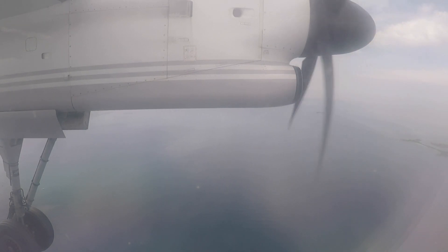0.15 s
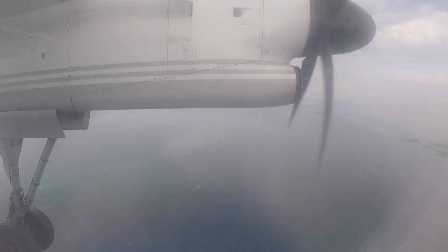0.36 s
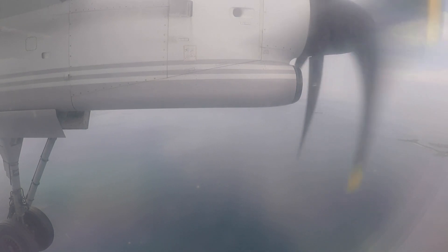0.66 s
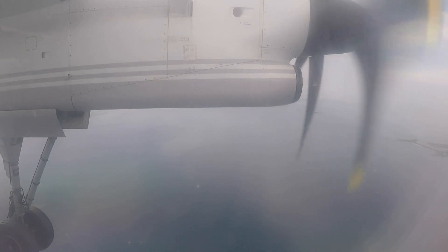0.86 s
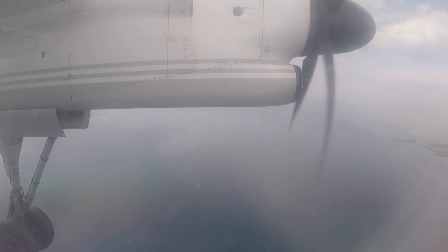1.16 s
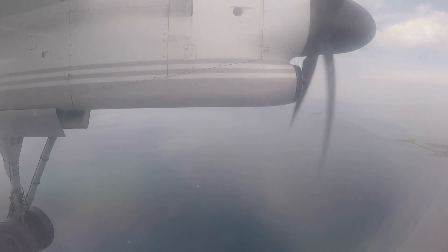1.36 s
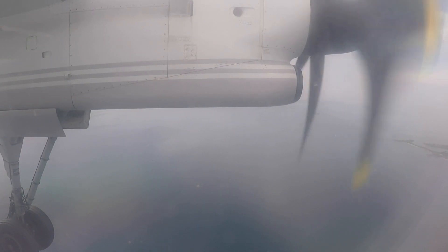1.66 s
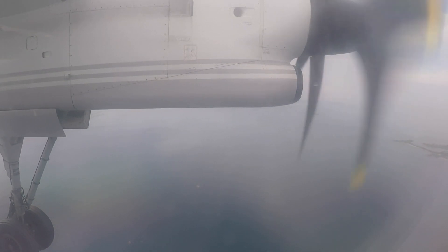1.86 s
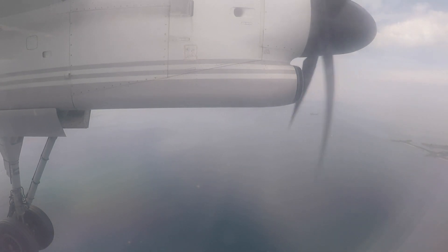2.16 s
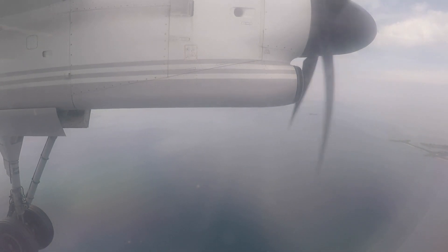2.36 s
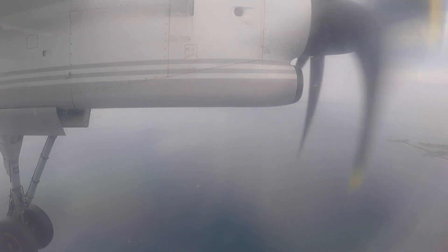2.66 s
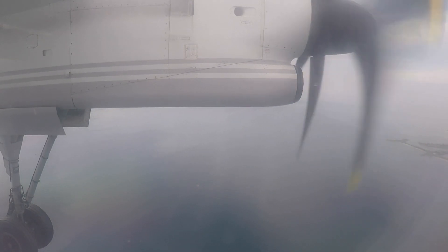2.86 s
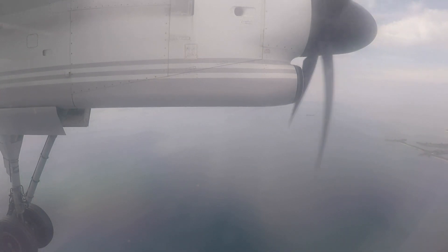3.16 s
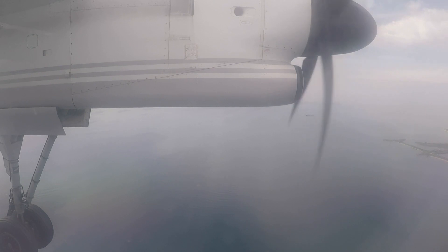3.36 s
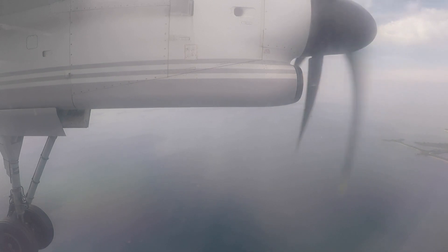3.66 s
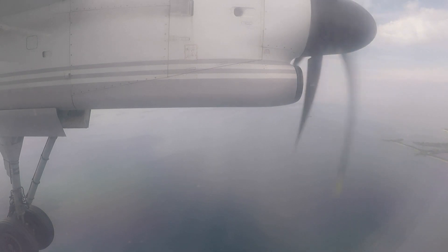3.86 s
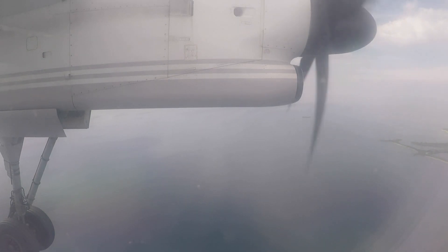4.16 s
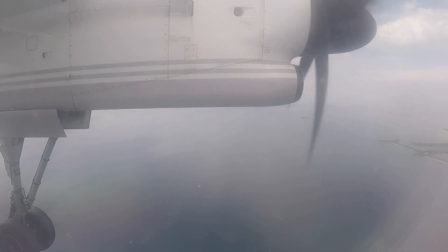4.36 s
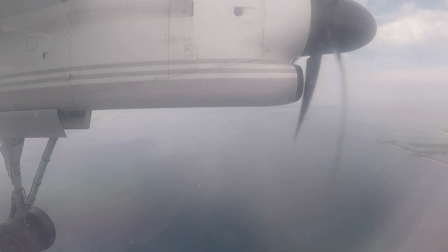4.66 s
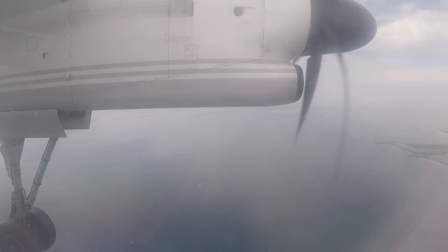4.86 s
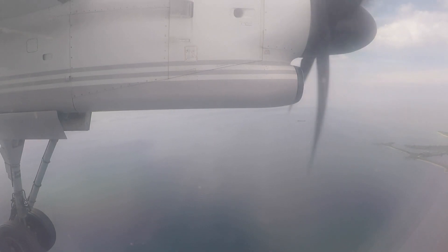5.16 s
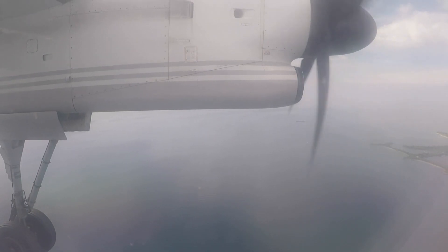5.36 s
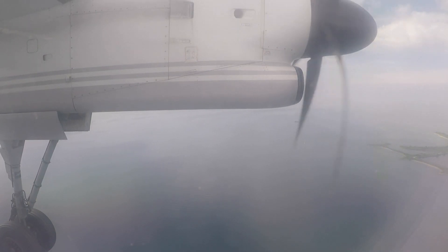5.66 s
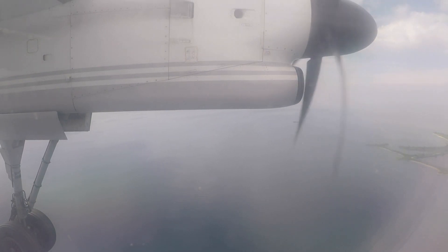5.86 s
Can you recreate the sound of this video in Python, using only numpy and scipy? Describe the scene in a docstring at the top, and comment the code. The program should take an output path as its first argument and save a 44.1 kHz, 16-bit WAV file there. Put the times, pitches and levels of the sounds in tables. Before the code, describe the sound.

Heard from a window seat, a turboprop plane's engine hums and rumbles steadily, with booming air buffeting and a thin whine.

```python
"""Window seat beside the engine of a turboprop airliner on approach, landing gear down.
From the start a gust booms the cabin; propellers hum at blade rate and beat against air shed by the
gear; a gearbox whines over slipstream rush and turbine hiss. The slipstream eases by 2.6 s.
Trim ticks from 3.5 to 4.6 s, amid a second gust and surges off the gear; a last gust comes at 5.8 s.
The camera's limiter holds the bass down throughout."""
import sys
import numpy as np
from scipy import signal
from scipy.fft import irfft, next_fast_len
from scipy.io import wavfile
from scipy.ndimage import uniform_filter1d

SR = 44100
rng = np.random.default_rng(int(sys.argv[2]) if len(sys.argv) > 2 else 0)


def bounce(signal):
    """Save signal as a 16-bit WAV file at the path given by the first command-line argument."""
    frames = np.transpose(np.atleast_2d(signal))
    limited = np.clip(frames, -1, 1)
    pcm = np.round(limited * 32767).astype(np.int16)
    wavfile.write(sys.argv[1], SR, pcm)


N = 265041
TIME_S = np.arange(N) / SR
BINS_HZ = np.maximum(np.fft.rfftfreq(next_fast_len(N, True), 1 / SR), 1)


def undb(db):
    """Decibels to gain."""
    return 10 ** (np.asarray(db) / 20)


def unit(x):
    """Scale to rms 1."""
    return x / np.sqrt(np.mean(x ** 2))


def curve(points):
    """Rows of (time_s, value), interpolated at every sample."""
    return np.interp(TIME_S, *np.transpose(points))


def swells(rows):
    """Half-cosine rises and dips in dB, one per row."""
    return sum(db * np.cos(np.pi * np.clip((TIME_S - peak_s) / length_s, -.5, .5))
               for peak_s, length_s, db in rows)


def colour(points, peaks=()):
    """Gain per bin: smooth spectrum plus resonances, steep fall past the last point."""
    hz, db = np.transpose(points)
    lift_db = sum(up / (1 + (2 * (BINS_HZ - f) / width) ** 2) for f, width, up in peaks)
    fall_db = 36 * np.maximum(np.log2(BINS_HZ / hz[-1]), 0)
    return undb(np.interp(np.log(BINS_HZ), np.log(hz), db) + lift_db - fall_db)


def noise(gain):
    """Noise shaped by a gain per bin, rms 1."""
    spectrum = rng.standard_normal(len(BINS_HZ)) + 1j * rng.standard_normal(len(BINS_HZ))
    return unit(irfft(gain * spectrum)[:N])


def walk(rate_hz):
    """Slow random drift, rms 1."""
    return noise(np.exp(-(BINS_HZ / rate_hz) ** 2 / 2))


def steady(x, span_s):
    """Level out swells slower than span_s; keep the flutter."""
    size = max(int(span_s * SR), 2)
    return x / np.sqrt(uniform_filter1d(uniform_filter1d(x ** 2, size), size))


def tone(hz):
    """Sine on a moving frequency, rms 1."""
    return np.sqrt(2) * np.sin(2 * np.pi * (np.cumsum(hz) / SR + rng.random()))


def flow_db():
    """Slipstream strength about its mean."""
    # slipstream strength: time_s, level_db
    strength = [(0, -36.5), (0.4, -35.5), (1.15, -33.5), (1.45, -34.5), (1.8, -33.5), (2.15, -34.5),
                (2.6, -39), (3.9, -38.5), (5.05, -39.0), (5.4, -37), (6.0, -38)]
    db = curve(strength)
    return db - db.mean()


def hiss_db():
    """Turbine hiss level; follows the slipstream."""
    return -52.5 + .88 * flow_db()


def boom(modes):
    """Turbulence rings a few air modes, rms 1."""
    power = sum(undb(2 * db) / (1 + 2 * ((BINS_HZ - hz) / width) ** 2) ** 2 for hz, width, db in modes)
    return steady(noise(np.sqrt(power)), span_s=0.17)


def buffet(rumble_db=-17.5, boom_db=-20, upper_db=-21.5):
    """Turbulence booms the cabin over a deep rumble; gusts lift the lower modes."""
    # deep rumble spectrum: freq_hz, density_db
    rumble_shape = [(8, -22), (18, -11), (25, -7), (37, -4.5), (52, -5.5), (62, 0), (71, 5.5), (84, -4),
                    (125, -11.5)]
    # lower and upper cabin air modes: pitch_hz, width_hz, relative_db
    lower_modes = [(97.05, 9, 0), (110.2, 9.8, -1.5)]
    upper_modes = [(120.6, 8.7, -0.31), (126.9, 14, -2.3), (140.2, 6.8, -0.86)]
    # gusts: peak_s, length_s, lift_db
    gusts = [(0.02, 0.18, 9.5), (3.76, .35, 8), (5.8, 0.36, 7.5)]
    rumble = undb(rumble_db + 1.4 * walk(4)) * steady(noise(colour(rumble_shape)), span_s=0.18)
    lower = undb(boom_db + swells(gusts)) * boom(lower_modes)
    return rumble + lower + undb(upper_db) * boom(upper_modes)


def propeller(blade_hz, gain_db=-0.5, waver_db=0.05):
    """Blade passages press on the fuselage; uneven inflow makes the harmonics waver."""
    # near propeller loudness: time_s, level_db
    loudness = [(0, -21), (0.8, -18.5), (1.65, -23), (2.2, -15.5), (2.8, -15), (3.3, -20.5), (3.6, -15),
                (4.35, -23), (4.7, -16.5), (5.0, -22), (5.25, -15.5), (6.0, -16)]
    # blade-rate harmonics: multiple, relative_db
    orders = [(1, 1.5), (2, -23), (3, -27.5), (4, -38)]
    hum = sum(undb(db + waver_db * walk(0.97)) * tone(k * blade_hz) for k, db in orders)
    return undb(curve(loudness) + gain_db) * hum


def landing_gear(shed_hz=109.35, wander_hz=3.7, level_db=-17.5, flutter_db=2.5):
    """Vortices peel off the struts; their wandering pitch beats against the propeller."""
    # surges and lulls of shed air: peak_s, length_s, lift_db
    surges = [(0.12, .16, -14), (0.28, 0.16, 4.5), (0.54, .1, -10.5), (1.35, .4, 4), (3.33, 0.19, 6.5),
              (3.96, .14, 8.5), (4.18, .14, -9.5), (4.47, .3, 10), (4.94, .1, 3.5), (5.2, 0.57, -10.5)]
    db = level_db + swells(surges) + flutter_db * steady(walk(6), span_s=.25)
    return undb(db) * tone(shed_hz + wander_hz * walk(4.005))


def machinery(mesh_hz=805.3, drift_hz=.9, whine_db=-46):
    """The gearbox mesh whines over shaft and pump hums; all follow the slipstream."""
    # shaft and pump hums: pitch_hz, level_db
    hum_lines = [(18.8, -37), (167.5, -36), (313, -54), (502.5, -53)]
    whine = undb(whine_db + 1.74 * walk(3)) * tone(mesh_hz + drift_hz * walk(3.8))
    hums = sum(undb(db + 2 * walk(3.1)) * tone(hz * (1 + 0.0017 * walk(3))) for hz, db in hum_lines)
    return undb(.9 * flow_db()) * (whine + hums)


def airflow(wall_db=-30, rush_db=-36):
    """The slipstream shakes the wall and rings the panels; turbine and vents hiss above it."""
    # spectra of wall shudder, slipstream on the skin, turbine and vent hiss: freq_hz, density_db
    shudder_shape = [(100, -14), (150, 5), (177, 3), (208, 0.5), (245, -3.5), (300, -12), (400, -19)]
    rush_shape = [(100, -8.5), (250, 2), (370, 2), (470, -1), (560, -1), (650, -4.5), (850, -2.5),
                  (910, -3.5), (1130, -6), (1600, -10), (2200, -13.5), (2650, -21.5), (4000, -45)]
    hiss_shape = [(1500, -12), (3200, -6.5), (4000, -6), (4500, -2.5), (5150, -3), (5800, .5), (6500, -3.3),
                  (7200, -11), (9000, -13), (10000, -16.5), (11600, -22), (13600, -19.5), (14400, -31)]
    # wall and window panel resonances: pitch_hz, width_hz, lift_db
    panels = [(582, 20, 3), (672, 16, 4), (757, 34, 6), (945, 40, 4), (1015, 84, 10.5), (1090, 20, 2),
              (1335, 40, 4), (1455, 60, 6), (1960, 60, 2)]
    # narrow whistles in the hiss: pitch_hz, width_hz, lift_db
    whistles = [(2900, 100, 5), (3620, 180, 6), (4380, 80, 4.5), (4600, 60, 3.5), (4815, 75, 6.5),
                (8640, 130, 3), (12950, 300, 4)]
    eddies = walk(2.5)
    shudder = undb(wall_db + 1.15 * flow_db() + 0.97 * walk(2.1)) * noise(colour(shudder_shape))
    rush = undb(rush_db + flow_db() + .5 * eddies) * noise(colour(rush_shape, panels))
    hiss = undb(hiss_db() + 0.4 * eddies) * noise(colour(hiss_shape, whistles))
    return shudder + rush + hiss


def turbine(blade_hz, compressor_hz=12998, compressor_db=-28.5, swing_hz=125):
    """Thin, shimmering turbine and compressor tones; levels relative to the hiss."""
    # turbine tones: pitch_hz, relative_db
    lines = [(5483, -25.5), (5662, -19), (5750, -26.5), (8055, -35)]
    tones = sum(undb(db + 3 * walk(5)) * tone(hz + 4.9 * walk(6)) for hz, db in lines)
    # each propeller blade passing the intake bends the compressor's whistle
    whistle = tone(compressor_hz + 14 * walk(6) + swing_hz * tone(blade_hz) / np.sqrt(2))
    return undb(hiss_db()) * (tones + undb(compressor_db + 2 * walk(4)) * whistle)


def trim(decay_s=0.017):
    """Plastic trim slips with a short, bright scratch."""
    # trim slips: start_s, level_db
    ticks = [(3.504, -50), (3.713, -54), (3.797, -53), (4.582, -55)]
    envelope = sum(undb(db) * (TIME_S >= s) * np.exp(-np.abs(TIME_S - s) / decay_s) for s, db in ticks)
    return envelope * noise(colour([(1000, -17.5), (5000, 10.0), (9000, -5), (13800, -13)]))


def scene():
    """Mono sum at the seat; the governor holds the blade rate nearly steady."""
    blade_hz = 85.4 + 0.405 * walk(0.97)
    mix = buffet() + propeller(blade_hz) + landing_gear() + machinery()
    return (mix + airflow() + turbine(blade_hz) + trim())[None]


def record(dry, split_hz=260, ceiling_db=-3.0, knee=3.4, drive_db=0.5, top_hz=15100, fade_s=.008):
    """The camera limits the bass alone, within a cycle or so, and cuts the top."""
    edge_s = np.minimum(TIME_S, TIME_S[-1] - TIME_S)
    dry = dry * np.sin(np.pi / 2 * np.clip(edge_s / fade_s, 0, 1)) ** 2
    bass = signal.sosfiltfilt(signal.butter(4, split_hz, fs=SR, output="sos"), dry)
    driven = undb(drive_db) * bass
    envelope = uniform_filter1d(np.abs(signal.hilbert(driven)), int(0.0054 * SR))
    gain = (1 + (envelope / undb(ceiling_db)) ** knee) ** (-1 / knee)
    lowpass = signal.ellip(10, .2, 80, top_hz, fs=SR, output="sos")
    return signal.sosfilt(lowpass, dry - bass + gain * driven)


dry = scene()
out = record(dry)
bounce(out)
```